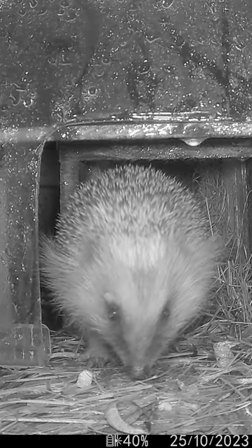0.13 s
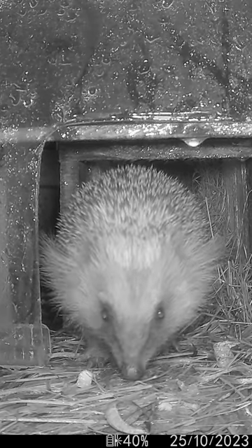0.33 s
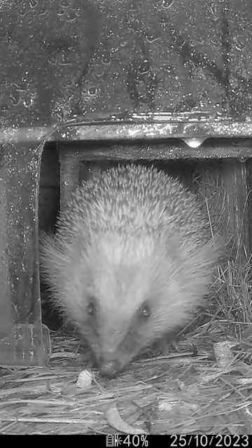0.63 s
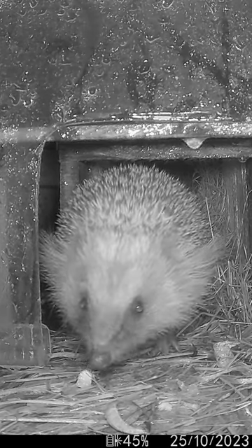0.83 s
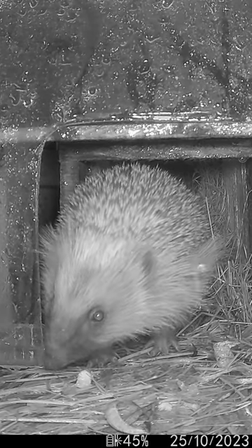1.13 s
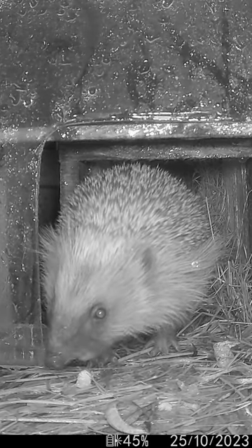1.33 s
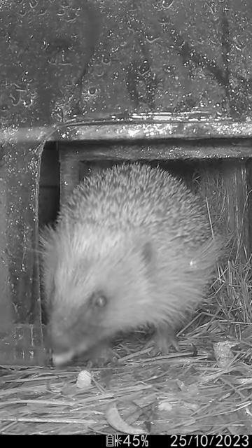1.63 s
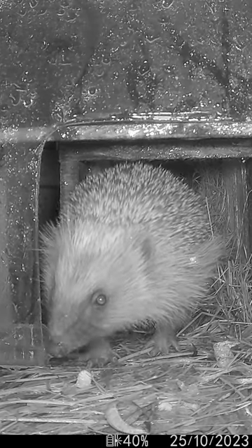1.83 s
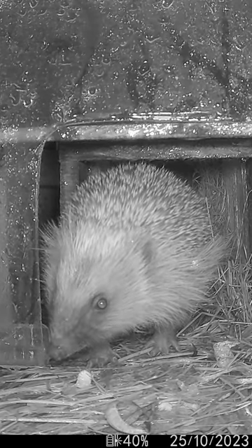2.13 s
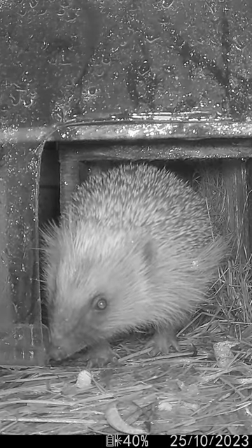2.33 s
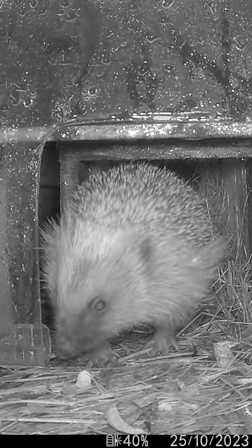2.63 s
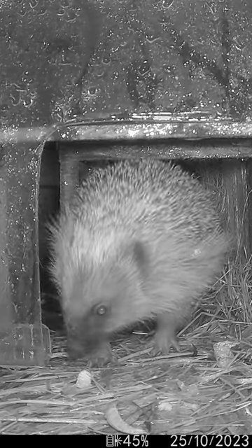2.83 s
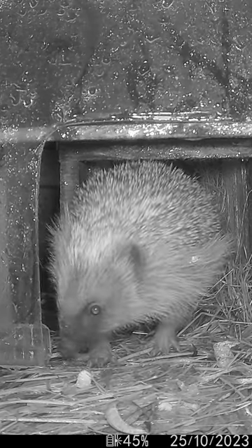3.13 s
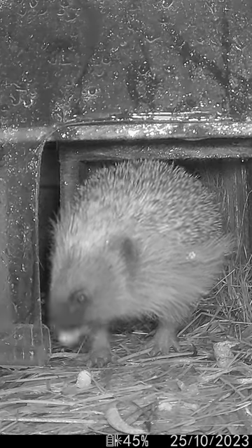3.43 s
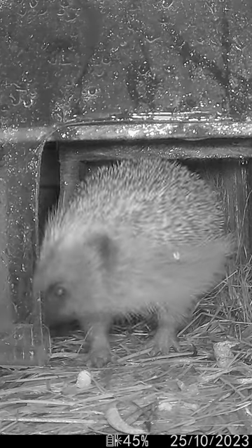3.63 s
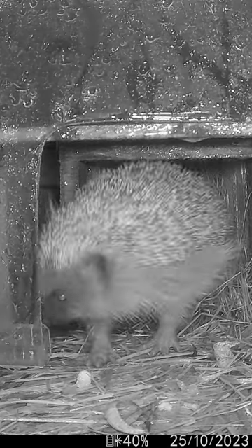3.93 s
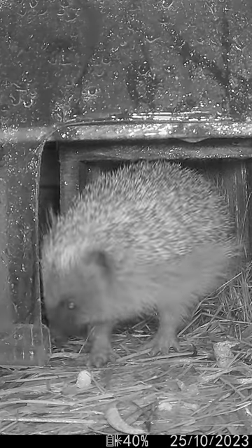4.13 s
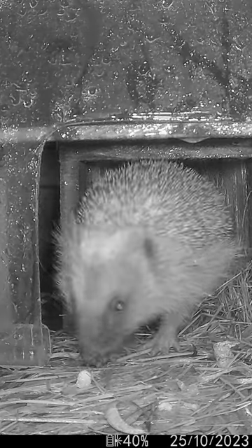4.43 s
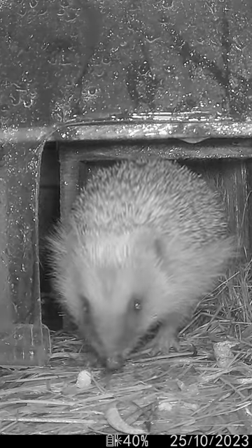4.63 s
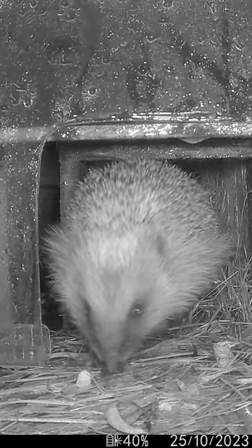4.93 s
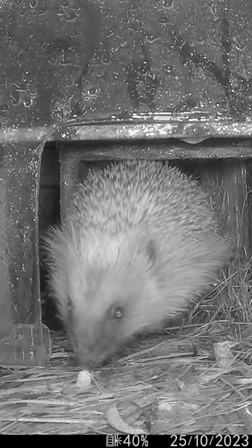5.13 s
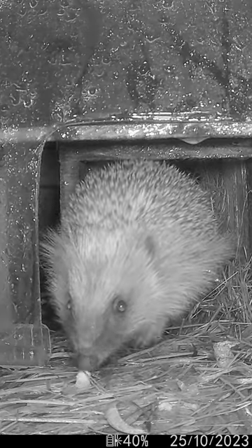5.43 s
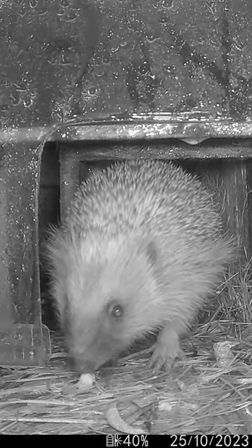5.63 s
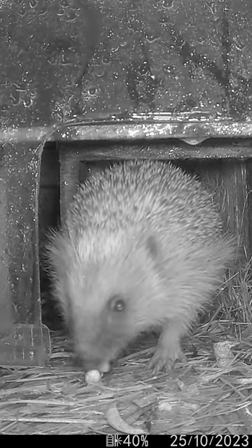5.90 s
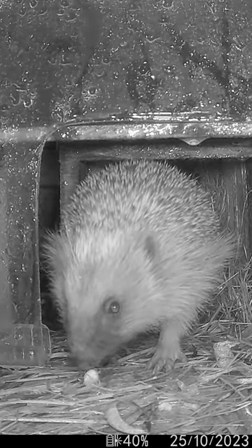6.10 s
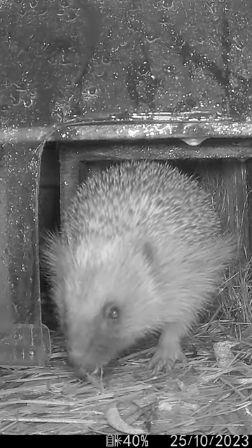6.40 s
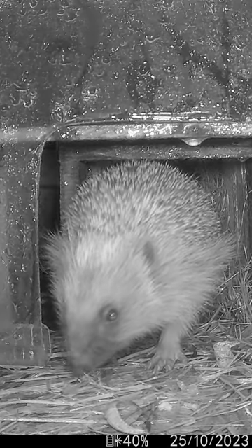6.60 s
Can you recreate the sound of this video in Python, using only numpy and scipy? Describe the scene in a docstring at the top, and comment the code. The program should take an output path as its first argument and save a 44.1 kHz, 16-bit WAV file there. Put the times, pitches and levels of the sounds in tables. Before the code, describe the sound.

Close to the microphone, a hedgehog moves on straw in the entrance of a thin-walled box. Strong taps, a thud and crisp plinks come early, over steady fine crackling. More knocks follow, then a loud cluster of bumps and rustling near the middle. Afterwards it calms to faint crackles, a few small ticks and soft nosing, with slight hiss and low outdoor rumble.

```python
"""A hedgehog shuffles on straw in the doorway of a wet, thin-walled feeding box, the microphone close by.
Spines, claws and perhaps raindrops tap the box: each tap is a random-phase ring of its resonances.
Straw crackles underneath as thousands of tiny clicks, and swells dully when snout and paws push it.
Feet thud on the floor as two sinking tones; drips and stalks plink with pitches of their own.
The taps, straw, scuffs, rubs and plinks are coloured by the short, hollow ring of the box."""
import sys
import numpy as np
from scipy import signal
from scipy.fft import irfft
from scipy.io import wavfile

SR = 44100
rng = np.random.default_rng(int(sys.argv[2]) if len(sys.argv) > 2 else 0)


def wav_record(signal):
    """Record a signal, one row per channel, as 16-bit PCM in the file named by sys.argv[1]."""
    frames = np.transpose(np.atleast_2d(signal))
    bounded = np.clip(frames, -1, 1)
    # unit amplitude maps onto the largest positive 16-bit level
    quanta = np.round(bounded * 32767).astype(np.int16)
    wavfile.write(sys.argv[1], SR, quanta)


N = 298097

# How long the box rings in body, knock, tick and snap. Each entry: time to fall by 60 dB in seconds.
BAND_T60_S = [0.12, 0.096, 0.15, 0.17]
USUAL_STIRRING_DB = -59
RING_S = np.arange(SR // 4) / SR   # time within one contact's ring
RING_HZ = np.arange(len(RING_S) // 2 + 1) * SR / len(RING_S) + 1e-3   # offset avoids division by zero


def from_db(db):
    """Turn decibels into an amplitude factor."""
    return 10 ** (np.asarray(db) / 20)


def rms_one(x):
    """Scale a sound to an rms of 1."""
    return x / np.sqrt(np.mean(x ** 2) + 1e-20)


def add(out, s, sound):
    """Mix a sound in at a time in seconds."""
    i = max(0, round(s * SR))
    out[i:i + len(sound)] += sound[:N - i]


def drift(points_per_s):
    """A wandering line through random points of spread 1."""
    points = rng.standard_normal(2000)
    return np.interp(np.arange(N) / SR * points_per_s, np.arange(len(points)), points)


def resonance(hz, width_hz):
    """Gain of a damped resonance with steep skirts, half its peak at the edges of its width."""
    return 1 / (1 + ((RING_HZ - hz ** 2 / RING_HZ) / width_hz) ** 2)


def box_colour(mode_width_hz=19):
    """Gain of the box by frequency: wall resonances standing on a dense background."""
    # The dense response between the resonances. Each row: frequency in Hz, gain in dB.
    background = [(60, 6), (120, -6), (200, 1), (330, -18), (620, -11.5), (1100, -13.5), (1900, -17),
                  (2600, -10.5), (3600, -10), (5000, -10), (6500, -14.5), (8400, -18.5), (9500, -25),
                  (15000, -36.5)]
    # Resonances of the box walls. Each row: frequency in Hz, strength in dB before a common doubling of power.
    modes = [(150, -0.5), (226, -2.5), (452, -1), (541, 3), (700, -0.5), (765, -5.5), (812, 1), (867, -4),
             (948, -4), (1055, -9), (1167, -3), (1287, -6), (1437, 1), (1507, -3), (1669, -4.5),
             (1755, -4.5), (1810, -4), (2066, -1), (2132, -5), (2255, -5.5), (2396, -13), (2536, -1.5),
             (2729, -7), (2892, -3), (2939, -6.5), (3207, -6), (3741, -2.5), (3927, -3), (4237, -3.5),
             (4718, -5.5)]
    hz, db = np.transpose(background)
    power = from_db(np.interp(np.log(RING_HZ), np.log(hz), db)) ** 2
    for mode_hz, mode_db in modes:
        offset = 2 * (RING_HZ - mode_hz) / mode_width_hz
        power = power + 2 * from_db(mode_db) ** 2 / (1 + offset ** 2) ** 2
    return np.sqrt(power)


def box_bands():
    """The box's gain split into body, knock, tick and snap."""
    # Borders of the four bands, lowest to highest. Each entry: frequency in Hz.
    edges_hz = [90, 330, 1200, 3300, 16000]
    colour = box_colour()
    return [colour * (RING_HZ >= low) * (RING_HZ < high) for low, high in zip(edges_hz, edges_hz[1:])]


def ring(colour, t60_s, crack, crack_s, rise_s):
    """One contact: modes in chance phases, an onset crack (softer if negative) and decay; rms 1 over 30 ms."""
    phases = 2 * np.pi * rng.random(len(colour))
    modes = irfft(colour * np.exp(1j * phases), len(RING_S))
    decay = from_db(-60 * RING_S / t60_s)
    onset = (1 + crack * np.exp(-RING_S / crack_s)) * (1 - np.exp(-RING_S / rise_s))
    sound = modes * decay * onset
    return sound / np.sqrt(np.mean(sound[RING_S < .03] ** 2))


def push(colour, hz, relative_width=1.0):
    """A soft push into the straw swells instead of cracking, and sounds dull and hollow."""
    return ring(colour * resonance(hz, relative_width * hz), t60_s=0.078, crack=0, crack_s=1, rise_s=0.0026)


def taps(rows, spot_db=2.0, spot_relative_width=0.079, roll_off_hz=12000):
    """Each spot favours its own resonances; a hard contact trades knock for snap; the bass rises last."""
    out, bands = np.zeros(N), box_bands()
    roll_off = 1 / np.hypot(1, (RING_HZ / roll_off_hz) ** 2)   # gentle roll-off of the taps' treble
    # body, knock, tick and snap
    cracks = [3.0, 0.2, -0.2, 0.5]
    rises_s = [0.00094, 0.00022, 0.00019, 0.00033]
    trims_db = [-6.5, 0.3, 0.9, 0.3]
    for s, db, bright_db, body_db, spot_hz in rows:
        spot = roll_off * (1 + from_db(spot_db) * resonance(spot_hz, spot_relative_width * spot_hz))
        tilt_db = np.array([body_db - bright_db, -bright_db, 0, bright_db])
        levels_db = db + tilt_db + trims_db
        for colour, level_db, t60_s, crack, rise_s in zip(bands, levels_db, BAND_T60_S, cracks, rises_s):
            add(out, s, from_db(level_db) * ring(colour * spot, t60_s, crack, crack_s=0.0018, rise_s=rise_s))
    return out


def stirring_db(s):
    """How hard the animal is moving at these times."""
    # The animal's stir in the straw. Each row: time in seconds, strength in dB.
    stirring = [(0, -54), (1.0, -56), (1.8, -55), (2.02, -48), (2.3, -56), (2.75, -55.5), (2.95, -57.5),
                (3.3, -54), (3.62, -59.5), (3.8, -47), (4.0, -45.5), (4.25, -54), (4.75, -62), (5.0, -66),
                (5.75, -65.5), (6.05, -61), (6.45, -61.5), (6.76, -57)]
    return np.interp(s, *np.transpose(stirring))


def night_air(rumble_db=-73, rumble_hz=90, hiss_db=-81):
    """A faint outdoor rumble of band-passed noise and the white hiss of the microphone."""
    white = rng.standard_normal((2, N))
    rumble = signal.sosfilt(signal.butter(2, [12, rumble_hz], "band", fs=SR, output="sos"), white[0])
    return from_db(rumble_db) * rms_one(rumble) + from_db(hiss_db) * white[1]


def straw(slips_per_s=1300, size_db=3.0, clump_db=1.73, patchy_db=2.0):
    """Stalks slip in clumps of tiny clicks of uneven size and colour, and each click rings in the box."""
    # The straw in body, knock, tick and snap.
    # Each row: level in dB relative to the usual stirring, share of the stirring's swing that it follows.
    straw_bands = [(-0.93, 0.84), (-1.5, 1.25), (0.7, 1.08), (2.5, 0.85)]
    swing_db = stirring_db(np.arange(N) / SR) - USUAL_STIRRING_DB
    born = rng.random(N) < slips_per_s * from_db(clump_db * drift(35)) / SR
    sizes = from_db(size_db * np.minimum(rng.exponential(1, N), 4))
    slips = born * sizes * rng.choice([-1, 1], N)
    spot = rng.integers(0, 4, N)   # each slip gets one of four rings
    out = np.zeros(N)
    for colour, (band_db, follows), t60_s in zip(box_bands(), straw_bands, BAND_T60_S):
        force = slips * from_db(patchy_db * drift(60))
        crackle = np.zeros(N)
        for k in np.unique(spot):
            click = ring(colour, t60_s, crack=1.38, crack_s=0.0037, rise_s=.0001)
            crackle += signal.oaconvolve(force * (spot == k), click)[:N]
        out += rms_one(crackle) * from_db(USUAL_STIRRING_DB + band_db + follows * swing_db)
    return out


def light_taps(per_s=6, usual_db=-58.5, spread_db=2.5, follows=0.85, low_hz=596, high_hz=3950):
    """Spines graze the walls at uneven times on chance spots, harder when the animal moves more."""
    bright_usual_db, bright_spread_db = 1, 3.5   # per band
    rows = []
    for k in range(int(per_s * N / SR)):
        when, where = rng.random(2)
        strength, hardness = rng.standard_normal(2)
        s = (k + when) / per_s
        swing_db = stirring_db(s) - USUAL_STIRRING_DB
        db = usual_db + follows * swing_db + spread_db * strength
        bright_db = bright_usual_db + bright_spread_db * hardness
        spot_hz = low_hz * (high_hz / low_hz) ** where
        rows.append((s, db, bright_db, 0, spot_hz))
    return taps(rows)


def box_taps():
    """Spines, claws and perhaps raindrops strike the box and set its walls ringing."""
    # Each row: start in seconds, level in dB before the band trims, brightness in dB per band,
    # body in dB above or below the usual, frequency in Hz that the struck spot favours.
    tap_rows = [(.129, -34, -2, 5, 495), (.1971, -32.5, -0.5, -2, 774), (.336, -51, 2.5, -12, 720),
                (.3802, -46, 0, -14, 790), (.5249, -54, -10, 1, 420), (.693, -50.5, 1, -2, 3180),
                (.719, -48.5, -0.5, -8, 2060), (.8637, -46.5, -3, 1, 537), (.929, -50.5, -5, -6, 580),
                (.9613, -51, 0.5, 3, 3180), (1.039, -56, 5.5, 4, 4530), (1.0801, -50.5, 0, -3, 1410),
                (1.1158, -53, 8.5, 8, 3400), (1.2944, -54.5, -7.5, 2, 1000), (1.5161, -32.5, -3, 5, 1130),
                (1.7611, -40.5, 1.5, -9, 3470), (1.8258, -50, 0.5, 6, 650), (1.9036, -40, 2, 10, 540),
                (1.9397, -38.5, -1.5, 2.5, 2850), (2.0151, -35, -1, 2, 630),
                (2.1503, -50.5, 5.5, -10, 4040), (2.5046, -57, -1, 4, 840), (2.7579, -40.5, 0, 3, 1790),
                (2.8369, -44, -0.5, -6, 860), (2.8863, -51.5, -2.5, 2, 960), (2.943, -54.5, 1, 10, 2510),
                (3.0621, -57.5, -6, 2, 810), (3.134, -39.5, 2.5, 11.5, 3000), (3.4397, -48.5, -2, -1, 1310),
                (3.7346, -32.5, -.5, -5, 1400), (3.7518, -36, -1.5, -8, 2540), (3.7874, -39, 6, 18, 5360),
                (3.8072, -34.5, 0, 1.5, 2940), (3.8876, -27, -0.5, -1.5, 820),
                (3.9402, -41.5, 3.5, -1, 2800), (3.9882, -40.5, -0.5, -3, 780),
                (3.999, -29.5, -2, -8.5, 820), (4.1073, -33, -0.5, 1.5, 535),
                (4.4994, -48.5, 1.5, 7.5, 535.2), (4.524, -53, 0, 4, 4270), (4.662, -61, 7, 10, 3620),
                (4.9506, -66.5, -6.5, 0, 456), (5.1966, -60.5, -3, 2, 3180), (5.5999, -61.5, 0, 5, 2420),
                (5.8616, -49.5, 0, 4, 3830), (6.0908, -59, 3, -3, 2118), (6.127, -59.5, .5, 6, 677),
                (6.4435, -58.5, 4.5, 2, 4850), (6.551, -61.5, 1, 9, 1180), (6.686, -47, 0.5, 1, 2230)]
    return taps(tap_rows)


def footfalls(t60_s=0.13, rise_s=0.0024, settle=0.34, settle_s=0.0093, upper_ratio=1.365, upper_db=-6):
    """A soft paw scuffs the straw and wakes two low floor modes, which sink in pitch as the weight settles."""
    # Paws on the floor. Each row: start in seconds, peak of the thud in dB, settled pitch of the lower mode in Hz.
    steps = [(.178, -31, 160.5), (0.904, -34.5, 134), (1.673, -34.5, 144), (3.495, -33.5, 140),
             (3.788, -30, 152.6), (3.812, -33.5, 133), (4.17, -38, 153), (4.248, -38, 124),
             (4.371, -35, 133)]
    scuff_db, scuff_hz = -17.5, 487   # rms over 30 ms relative to the thud's peak; centre
    out, colour = np.zeros(N), box_colour()
    swell = (1 - np.exp(-RING_S / rise_s)) * np.exp(-np.log(1000) * RING_S / t60_s)
    for s, db, hz in steps:
        turn = 2 * np.pi * np.cumsum(hz * (1 + settle * np.exp(-RING_S / settle_s))) / SR
        upper = np.sin(upper_ratio * turn + rng.uniform(0, 2 * np.pi))
        thud = swell * (np.sin(turn) + from_db(upper_db) * upper)
        scuff = from_db(scuff_db) * push(colour, scuff_hz)
        add(out, s, from_db(db) * (thud / np.abs(thud).max() + scuff))
    return out


def plinks(click_hz=4000, click_width_hz=5000):
    """A small, quickly damped resonance sets the box ringing around its own pitch, over a bright click."""
    # Drips and snapping stalks. Each row: start in seconds, rms over the first 30 ms in dB,
    # centre in Hz, width in Hz, bright click in dB relative to the resonance.
    plink_rows = [(0.248, -35, 5000, 1200, -11), (0.6007, -27.5, 5030, 1210, -20.5),
                  (0.627, -34.5, 4660, 2400, 2), (.793, -57.5, 8500, 1300, -29),
                  (.981, -50, 11500, 5000, -16), (1.259, -44, 7000, 9000, -12),
                  (1.596, -53, 8260, 1400, -15), (2.266, -43, 1930, 1800, -4.5),
                  (3.253, -52.5, 11000, 9000, -4), (4.4254, -49, 5270, 2000, -12),
                  (5.737, -43, 1600, 1090, -5), (5.984, -56, 5740, 1300, -10), (6.381, -49, 1260, 700, -11)]
    out, colour, click = np.zeros(N), box_colour(), resonance(click_hz, click_width_hz)
    for s, db, hz, width_hz, click_db in plink_rows:
        own = np.hypot(resonance(hz, width_hz), from_db(click_db) * click)
        add(out, s, from_db(db) * ring(colour * own, t60_s=0.12, crack=0.37, crack_s=0.001, rise_s=0.000077))
    return out


def rubs(gap_s=.036, jitter=.25, usual_hz=810, spread_octaves=0.76, spread_db=2.5):
    """Snout and paws press through wet straw in quick, uneven runs of soft pushes."""
    # Bouts of pushing. Each row: start in seconds, length in seconds, usual rms of a push in dB.
    bouts = [(1.098, .03, -52), (1.32, .05, -52.5), (2.07, 0.16, -49.5), (2.92, .03, -50),
             (4.174, .22, -52), (6.015, .16, -56), (6.408, .15, -56.5)]
    out, colour = np.zeros(N), box_colour()
    for start, length, db in bouts:
        for delay in np.arange(0, length, gap_s):
            late, pitch, strength = rng.standard_normal(3)
            s = start + delay + jitter * min(delay, gap_s) * late   # the first push is on time
            hz = usual_hz * 2 ** (spread_octaves * pitch)
            add(out, s, from_db(db + spread_db * strength) * push(colour, hz))
    return out


def scene(low_cut_hz=85):
    """The small box radiates little deep bass; all sources reach one microphone."""
    air = night_air()
    box = straw() + light_taps() + box_taps() + footfalls() + plinks() + rubs()
    low_cut = signal.butter(2, low_cut_hz, "high", fs=SR, output="sos")
    return (signal.sosfilt(low_cut, box) + air)[None]


def record(dry, cutoff_hz=15500):
    """The top is cut steeply."""
    return signal.sosfilt(signal.ellip(10, .2, 70, cutoff_hz, fs=SR, output="sos"), dry)


dry = scene()
out = record(dry)
wav_record(out)
```